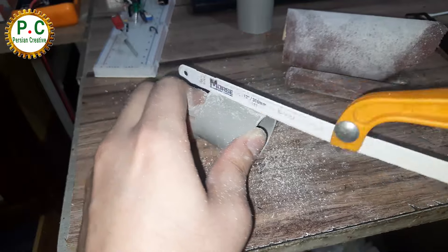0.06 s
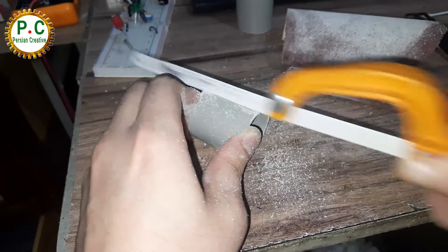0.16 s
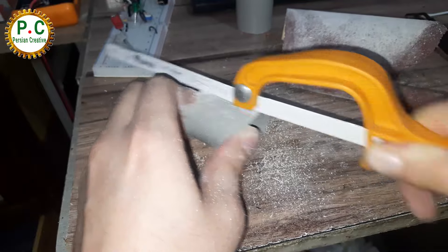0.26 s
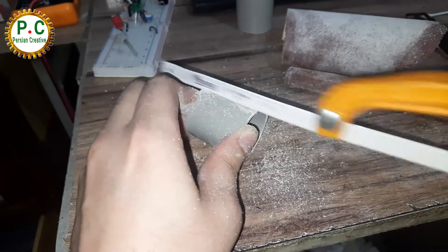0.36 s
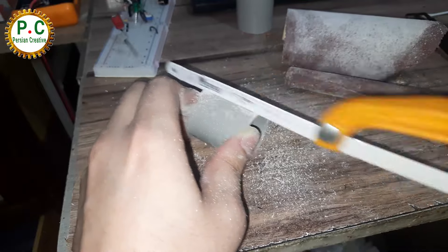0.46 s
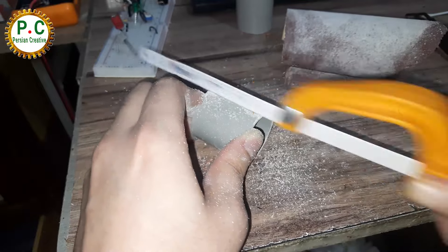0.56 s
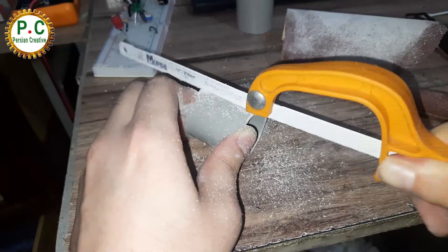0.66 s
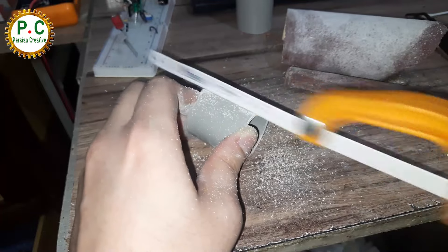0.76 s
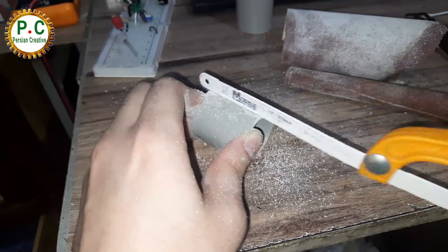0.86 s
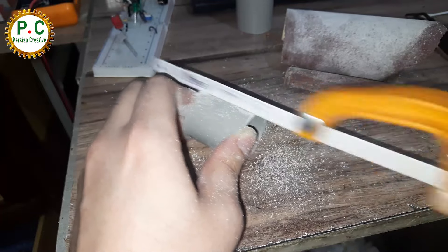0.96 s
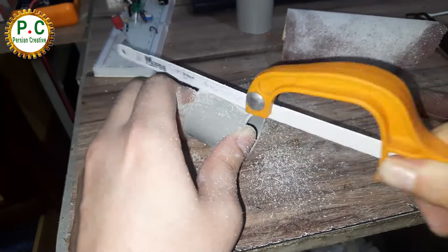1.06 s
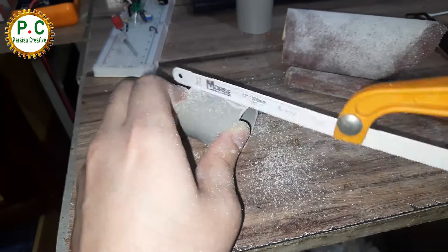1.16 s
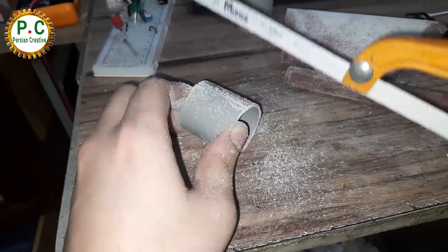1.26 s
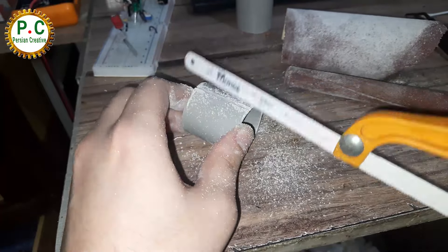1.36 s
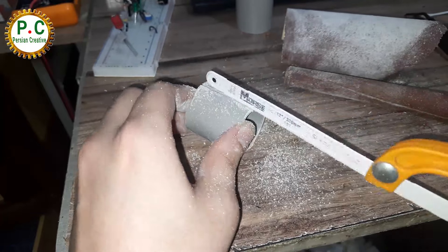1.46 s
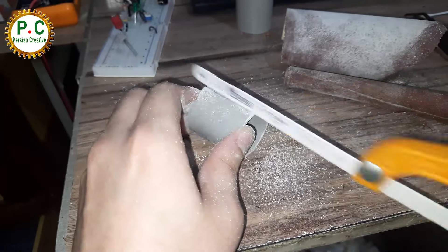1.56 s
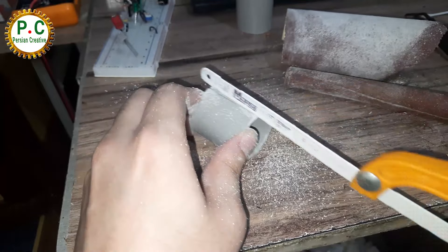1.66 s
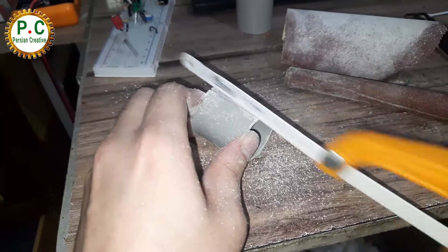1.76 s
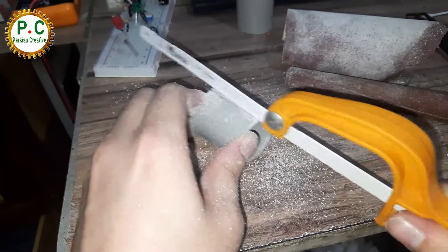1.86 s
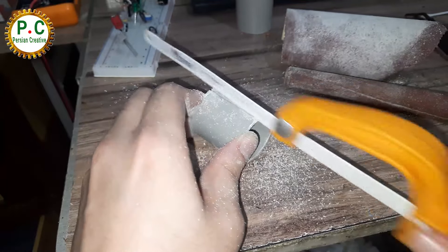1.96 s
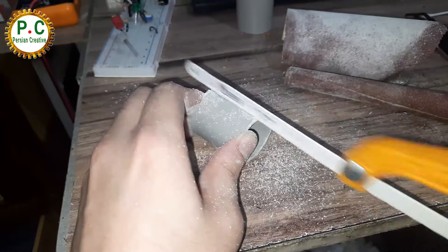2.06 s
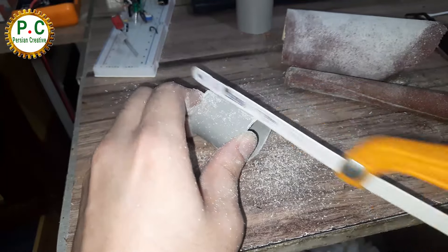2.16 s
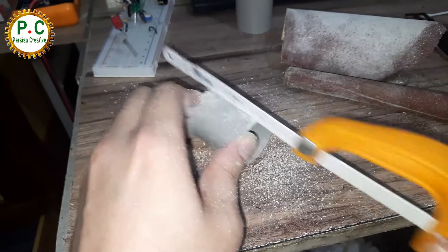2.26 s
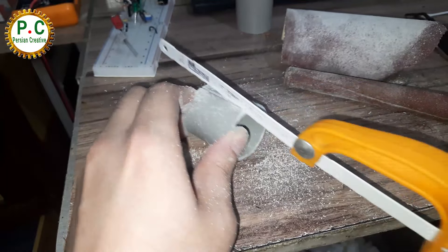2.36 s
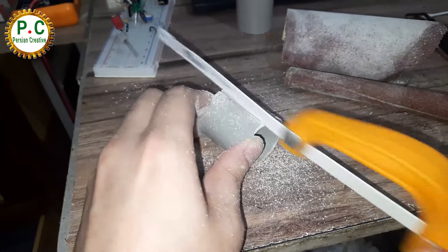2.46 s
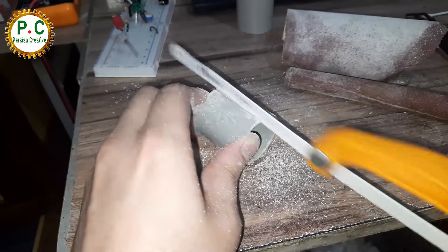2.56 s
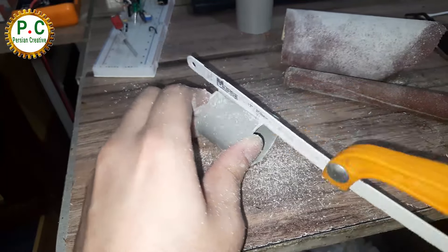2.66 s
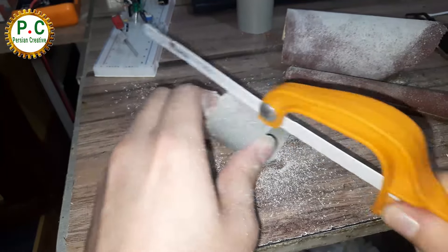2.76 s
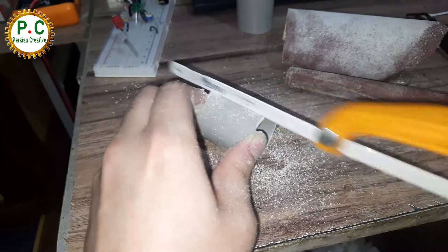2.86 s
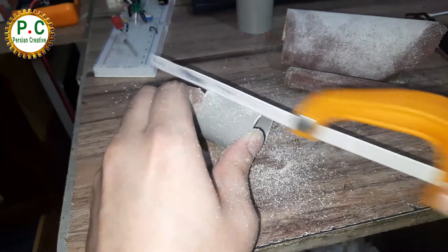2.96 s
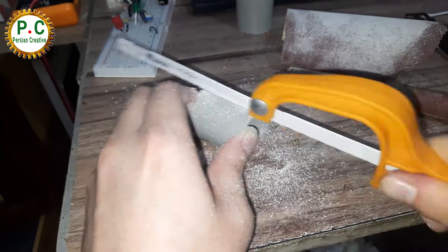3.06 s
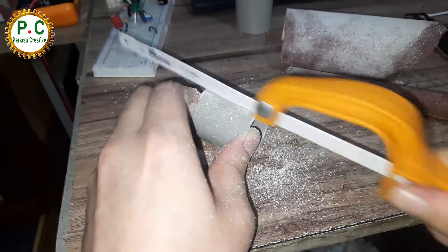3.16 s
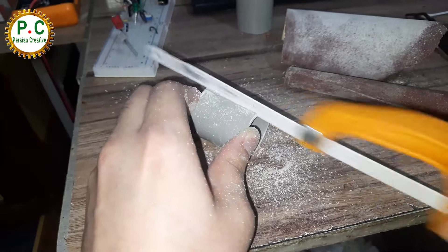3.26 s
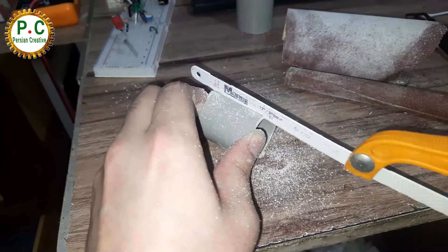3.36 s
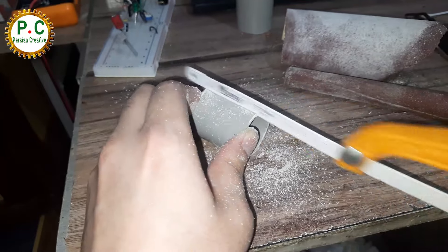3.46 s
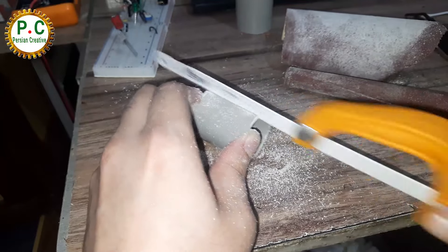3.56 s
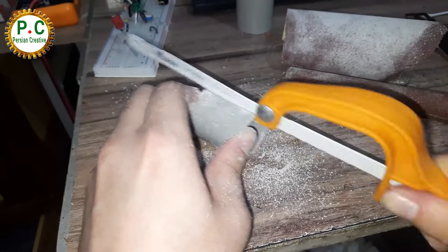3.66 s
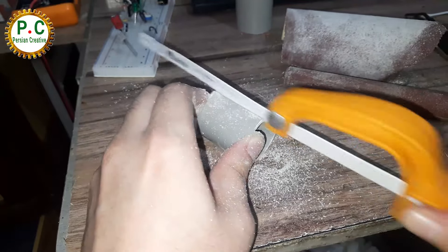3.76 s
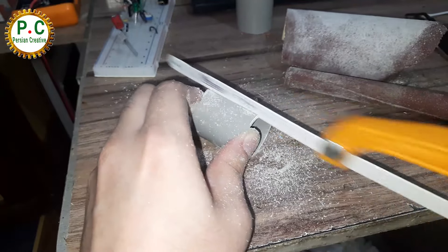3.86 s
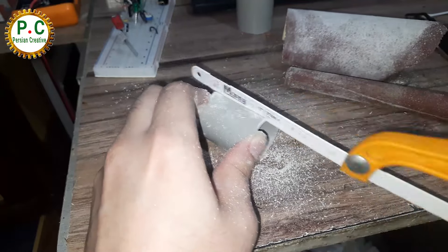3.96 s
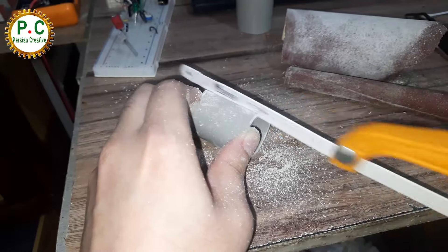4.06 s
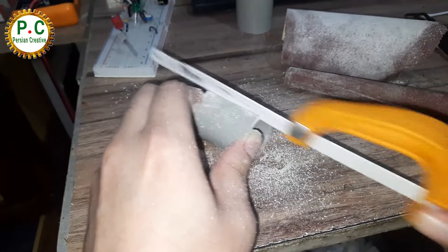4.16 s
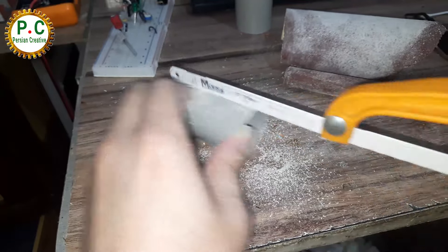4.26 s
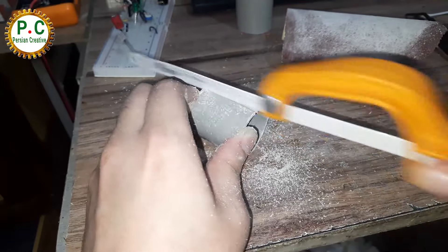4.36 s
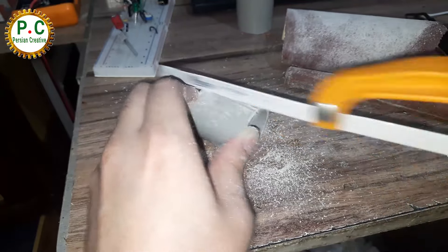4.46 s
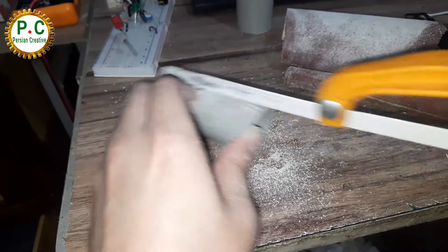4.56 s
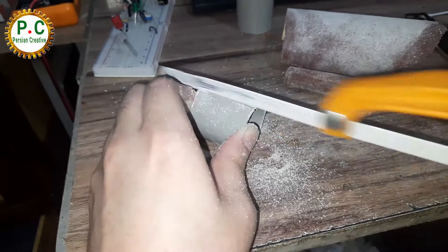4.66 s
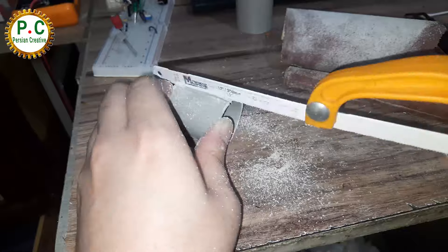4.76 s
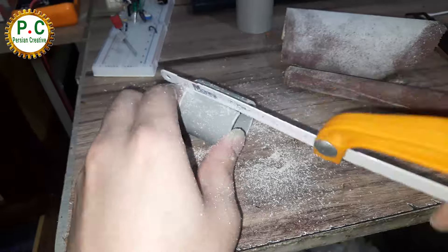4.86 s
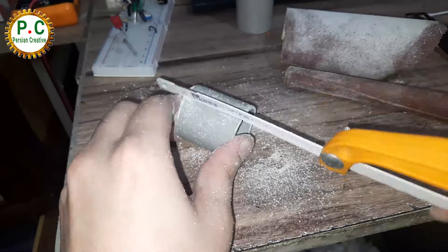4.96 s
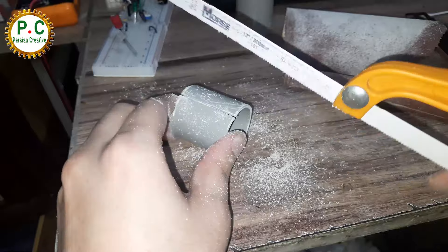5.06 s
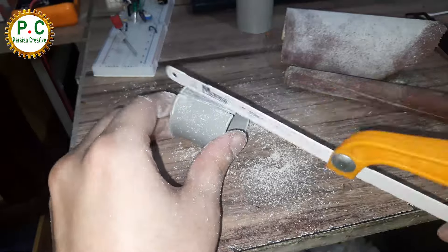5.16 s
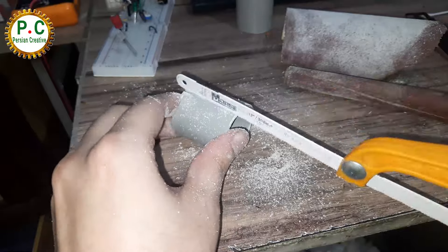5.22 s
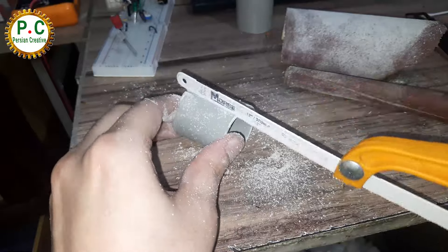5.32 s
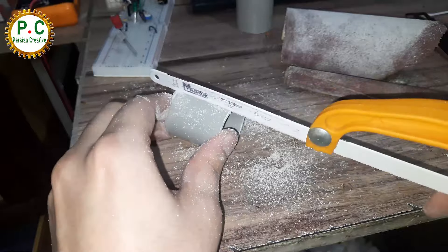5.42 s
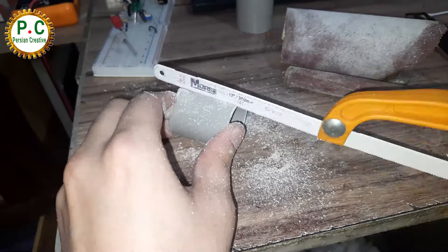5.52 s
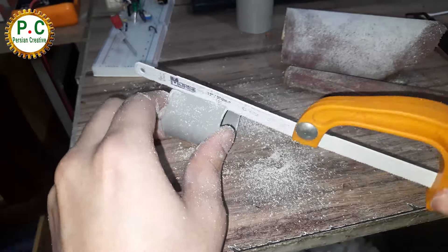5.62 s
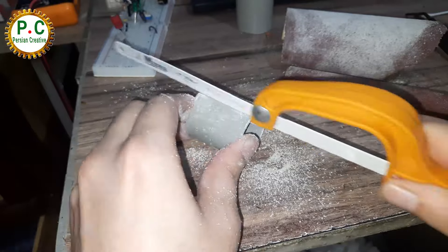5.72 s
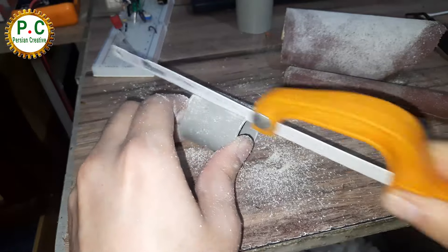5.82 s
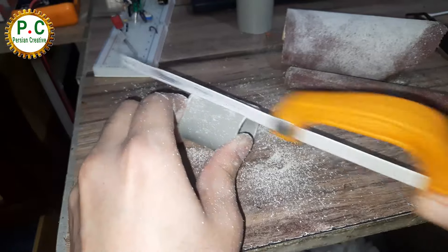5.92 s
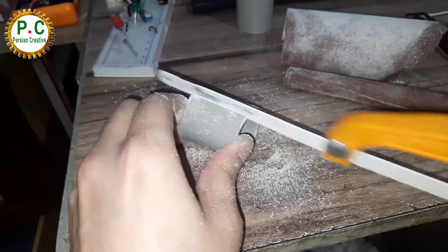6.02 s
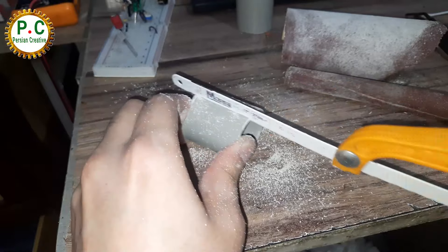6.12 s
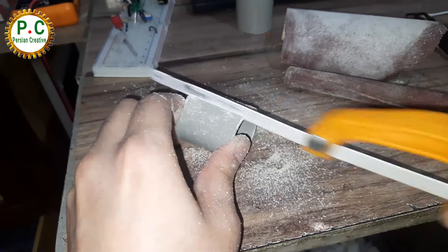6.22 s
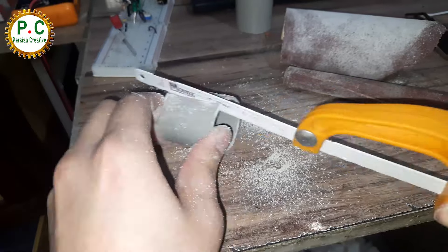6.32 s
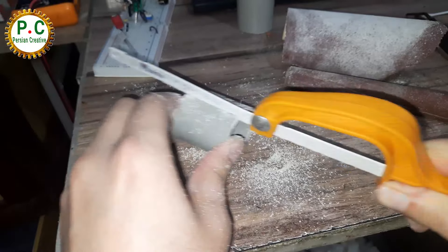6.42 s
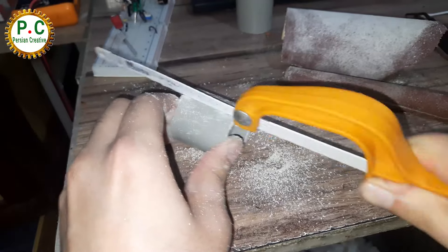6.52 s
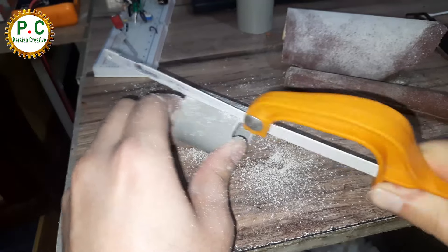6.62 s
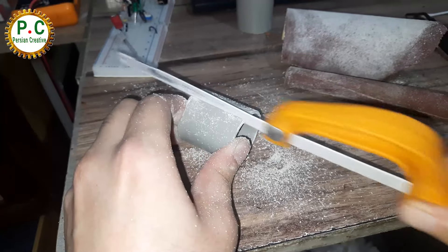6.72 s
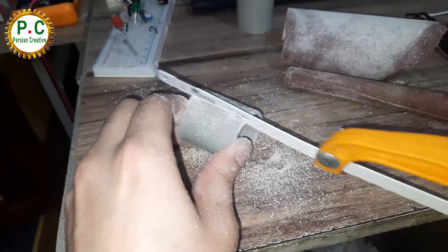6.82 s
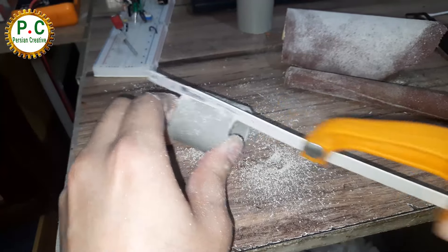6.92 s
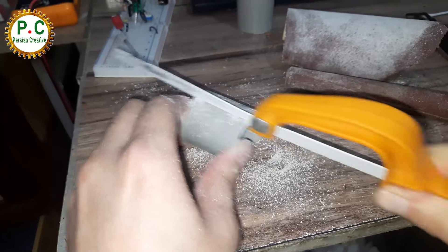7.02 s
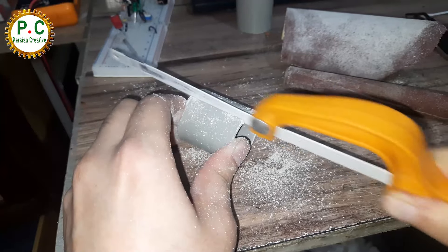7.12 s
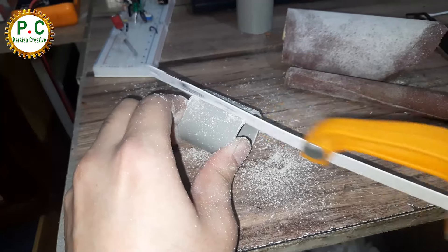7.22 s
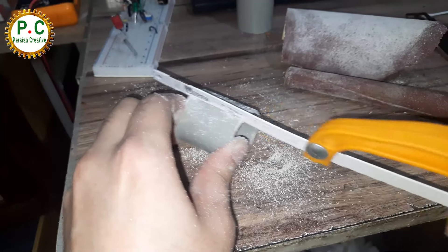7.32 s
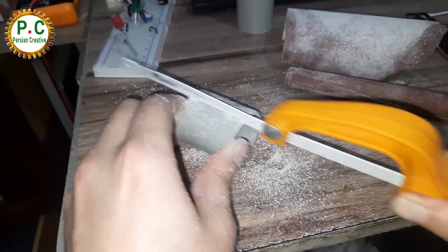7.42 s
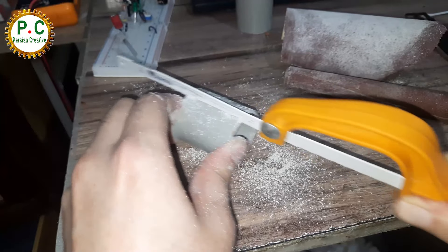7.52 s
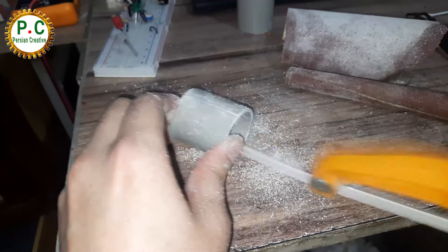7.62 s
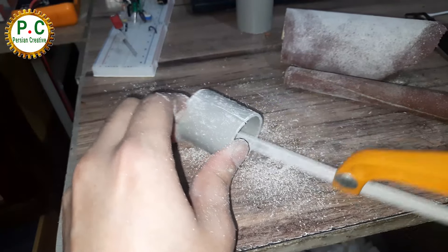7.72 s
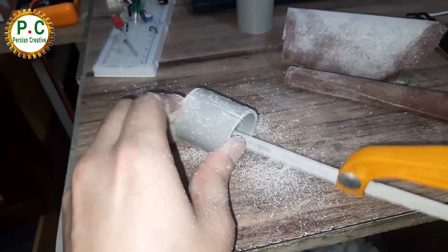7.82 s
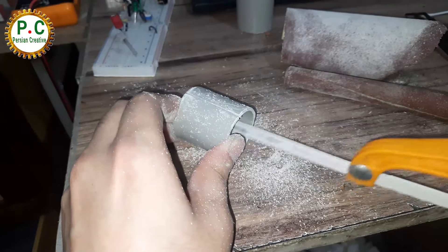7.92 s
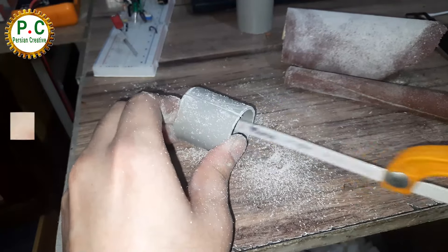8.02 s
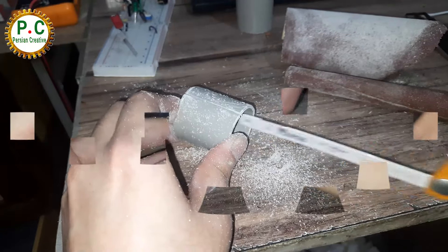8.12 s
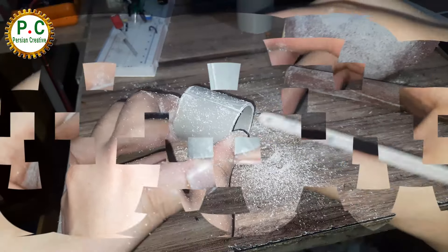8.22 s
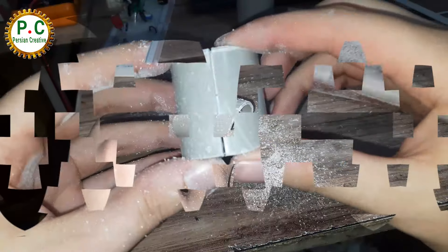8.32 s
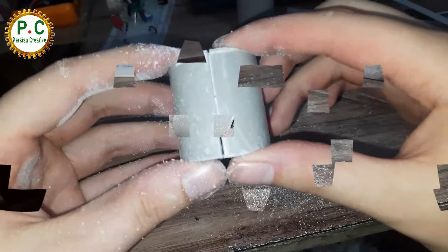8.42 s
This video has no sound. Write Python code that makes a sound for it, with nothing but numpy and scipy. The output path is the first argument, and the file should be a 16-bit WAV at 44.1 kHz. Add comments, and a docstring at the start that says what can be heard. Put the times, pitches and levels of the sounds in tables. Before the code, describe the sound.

Frantic, high-pitched sawing of plastic at about 25 strokes a second, two gaps, then slower, deeper rasps ending in a snap, scrape and two taps.

```python
"""Hacksaw through a plastic pipe

A small hacksaw slits a short plastic pipe held on a wooden bench, close to the microphone, in a small
room with mains hum. The first 6.6 s run at five times natural speed, so strokes, resonances, hum and
echo are five times higher and shorter. Then come four strokes at natural speed; the blade breaks through,
scrapes out of the slit and taps the pipe twice. Teeth are clicks and noise paced by the blade; blows
ring the pipe's modes. Layer gains and the room still act on the levels in the tables of contacts."""
import sys
import numpy as np
from scipy import signal
from scipy.fft import rfft, irfft, next_fast_len
from scipy.io import wavfile

SR = 44100
rng = np.random.default_rng(int(sys.argv[2]) if len(sys.argv) > 2 else 0)


def pcm_store(signal):
    """Save signal as 16-bit PCM."""
    levels = np.round(np.clip(np.atleast_2d(signal), -1, 1) * 32767)
    wavfile.write(sys.argv[1], SR, levels.astype(np.int16).T)


N = 374048
T = np.arange(N) / SR
FAST, SLOW_FROM_S = 5, 6.635  # speed of the quick part; where the natural speed begins


def undb(db):
    """Decibels to gain."""
    return 10 ** (np.asarray(db) / 20)


def unit(x):
    """Scale to rms 1."""
    return x / np.sqrt(np.mean(x ** 2))


def noise():
    """White noise."""
    return rng.standard_normal(N)


def walk(rate_hz):
    """Random values joined by lines, rate_hz of them a second."""
    steps = rng.standard_normal(N // 4)
    return np.interp(T * rate_hz, np.arange(len(steps)), steps)


def response(points, size):
    """Gains of a spectrum of (hz, level_db) points that falls 20 dB an octave more past its ends."""
    octave = np.log2(np.maximum(np.fft.rfftfreq(size, 1 / SR), 1))
    hz, db = np.transpose(points)
    at = np.log2(np.maximum(hz, 1))
    outside = np.maximum(at[0] - octave, 0) + np.maximum(octave - at[-1], 0)
    return undb(np.interp(octave, at, db) - 20 * outside)


def colour(x, points):
    """Filter by a spectrum of (hz, level_db) points; rms 1."""
    size = next_fast_len(N)
    return unit(irfft(rfft(x, size) * response(points, size), size)[:N])


def filtered(kind, order, edge_hz, x, both_ways=False):
    """Butterworth filter, run forwards or both ways."""
    sos = signal.butter(order, edge_hz, kind, fs=SR, output="sos")
    return signal.sosfiltfilt(sos, x) if both_ways else signal.sosfilt(sos, x)


def chips(rate_hz, spread_db):
    """Sparse clicks of very uneven size: plastic chips breaking off."""
    breaks = rng.random(N) < rate_hz / SR
    size_db = spread_db * np.minimum(rng.exponential(size=N), 5)
    return unit(breaks * noise() * undb(size_db))


def struck(rows, column, rise_s=0.00034):
    """Envelope of blows: a sudden rise, then an exponential fall with each row's own decay (last column)."""
    out = np.zeros(N)
    for row in rows:
        start = int(row[0] * SR)
        age = T[:min(SR // 8, N - start)]
        fall = np.exp(-age / max(row[-1], 1e-4))
        out[start:start + len(age)] += undb(row[column]) * np.minimum(age / rise_s, 1) * fall
    return out


def snap(rows, column, points, size=2048):
    """The first instant of each contact: one coloured minimum-phase click with a sheer front."""
    rows, pulses = np.array(rows), np.zeros(N)
    pulses[(rows[:, 0] * SR).astype(int)] = undb(rows[:, column])
    # folding the cepstrum packs the energy at the front
    cepstrum = irfft(np.log(response(points, size)))
    folded = np.r_[cepstrum[0], 2 * cepstrum[1:size // 2]]
    click = irfft(np.exp(rfft(folded, size)))
    return signal.oaconvolve(pulses, click / np.abs(click).max())[:N]


def swell(crest_s, db, rise_db_s, fall_db_s, hold_s=0):
    """Envelope that rises to its crest, holds and falls, evenly in dB."""
    before = np.maximum(crest_s - T, 0)
    after = np.maximum(T - crest_s - hold_s, 0)
    return undb(db - rise_db_s * before - fall_db_s * after)


# level of the steady background noise over time: time_s [s], level_db [dB]
BACKGROUND_LEVEL = [(0, -60), (1.4, -75), (4.9, -74.5), (5.4, -78.5), (6.4, -69.5), (8.2, -83.5),
                    (8.48, -77)]
# spectra of the background noise at the microphone, quick then natural speed: pitch_hz [Hz], level_db [dB]
QUICK_AIR = [(60, -31), (110, -42), (195, -29.5), (250, -3), (300, -1), (420, -13), (480, -16.5),
             (600, -2.5), (720, -19.5), (900, -11.5), (1200, -14), (2200, -22.5), (2490, -10.5),
             (2750, -22.5), (8000, -33), (15000, -40)]
SLOW_AIR = [(15, -38.5), (25, -20.5), (43, -9.5), (87, -8), (124, -17), (159, -14.5), (389, -23),
            (496, -22), (669, -32.5), (7300, -42), (16500, -44)]
# mains hum and the tones that waver beside it: pitch_hz [Hz], level_db [dB], waver_db [dB]
QUICK_HUM = [(282, -80, 1.5), (398, -86.5, 10), (600, -76, -0.5), (880, -92, 6.5)]
SLOW_HUM = [(59, -84.5, 1.7), (118, -81, 1), (500, -90.5, 2)]


def background(air, hum, speed):
    """Softly wavering noise, partly shared by the two sides, and hum tones that drift in level and phase."""
    shared = colour(noise(), air)
    air_db = np.interp(T, *np.transpose(BACKGROUND_LEVEL)) + 1.5 * walk(3 * speed)
    out = np.array([unit(shared + 0.5 * colour(noise(), air)) for _ in range(2)]) * undb(air_db)
    for hz, db, waver in hum:
        level = np.sqrt(2) * undb(db + waver * walk(5 * speed))
        out = out + level * np.sin(2 * np.pi * hz * T + 0.43 * waver * walk(4 * speed))
    return out


# the bench and the corner it stands in ring, at natural speed: pitch_hz [Hz], width_hz [Hz], level_db [dB]
BENCH_MODES = [(115.7, 7.1, -1.5), (175.7, 6, 1.5), (198, 5.9, 3), (297.8, 2.9, 6.5), (328.7, 5.4, -6.5),
               (382.7, 8, -18.5), (431.3, 10, -14), (585, 7, -7.5)]


def room(x, speed, lag_ms, early_db, early_s, late_db, t60_s, damp_hz, boom_db, boom_s, boom_hz,
         wide_hz, modes_db):
    """Direct sound, the left side first; the ringing bench, near reflections, a duller tail and a low boom.

    The times early_s, t60_s and boom_s are 60 dB decays at natural speed."""
    size = next_fast_len(N + SR)
    hz, age = np.fft.rfftfreq(size, 1 / SR), T[:SR] * speed

    def echoes(t60):
        """Decaying noise that is wider in stereo at higher pitch."""
        decay = np.exp(-np.log(1000) * age / t60) * np.minimum(age / 0.0032, 1)
        burst = rng.standard_normal((2, SR)) * decay
        mid, side = rfft(burst / np.sqrt(np.sum(burst ** 2, axis=1, keepdims=True)), size)
        width = hz / (hz + wide_hz)
        return (mid + width * side * np.array([[1], [-1]])) / np.sqrt(1 + width ** 2)

    direct = np.exp(-2j * np.pi * hz * np.array([[0], [lag_ms / 1000]]))
    ring = sum(undb(db) / (1 + 2j * (hz / speed - centre) / width) for centre, width, db in BENCH_MODES)
    early = undb(early_db) * echoes(early_s)
    late = undb(late_db) * echoes(t60_s) / (1 + 1j * hz / damp_hz)
    boom = undb(boom_db) * echoes(boom_s) / (1 + 1j * hz / boom_hz) ** 3
    paths = direct + undb(modes_db) * ring + early + late + boom
    heard = irfft(rfft(x, size) * paths, size)[:, :N]
    return heard / np.sqrt(1 + undb(early_db) ** 2 + undb(late_db) ** 2)


# the blade lifts off and the pipe slides under the fingers:
# crest_s [s], level_db [dB], rise_db_s [dB/s], fall_db_s [dB/s]
RUBS = [(1.257, -59, 1998, 702), (1.352, -72, 900, 400)]
# spectrum of fingers on plastic: pitch_hz [Hz], level_db [dB]
RUB_COLOUR = [(2300, -16), (3100, 5), (4200, -4), (5200, -21)]


def rub():
    """Faint, soft rubs on the pipe as the grip shifts: swells of coloured noise."""
    return colour(noise(), RUB_COLOUR) * sum(swell(*row) for row in RUBS)


# the hand shifts the pipe on the bench: start_s [s], thud_db [dB], wood_db [dB], decay_s [s]
BUMPS = [(1.329, -39.5, -65, 0.0032), (1.339, -41, -68, 0.0027), (1.4905, -26, -39, 0.0049),
         (1.4995, -56, -26.5, 0.0023), (1.508, -33.5, -47, 0.0068), (5.228, -78, -63.5, 0.012),
         (5.289, -72, -62, 0.0056), (5.392, -61, -80.5, 0.009), (5.666, -57, -55, 0.0066)]
# spectra of those bumps, thud then wood: pitch_hz [Hz], level_db [dB]
BUMP_COLOURS = [
    [(200, 0.5), (320, 6), (500, 1), (720, -40)],
    [(550, 5), (1200, 6), (1700, -14), (2400, -23)],
]


def bumps():
    """Soft, dull contacts of the pipe with the bench: short noise bursts with no deep bass."""
    thud, wood = (colour(noise(), points) for points in BUMP_COLOURS)
    contact = thud * struck(BUMPS, 1, rise_s=0.0014) + wood * struck(BUMPS, 2, rise_s=0.0021)
    return filtered("high", 4, 270, contact)


# the last web tears, then the blade scrapes out of the slit:
# crest_s [s], level_db [dB], rise_db_s [dB/s], fall_db_s [dB/s]
SCRAPES = [(7.661, -25.5, 643.5, 2998), (7.706, -26.5, 445.5, 202.5)]
# spectra of the scrape and of the shuddering bench: pitch_hz [Hz], level_db [dB]
SCRAPE_COLOUR = [(290, -26.5), (500, -15.5), (605, -2.5), (651, -8.5), (1100, -10), (1220, 1), (1430, -14),
                 (1570, 1.5), (2130, -3.5), (2500, -3), (2650, -6.5), (3210, -6), (7380, -15),
                 (10000, -22.5), (15300, -21.5), (16500, -52)]
RUMBLE_COLOUR = [(15, -49.5), (25, -20), (118, -1.5), (151, -1.5), (181, -1.5), (334, -5), (387, -6.5),
                 (498, -8), (600, -4), (780, -36), (1320, -120)]


def breakthrough():
    """The last web of plastic tears and the blade scrapes out, widely scattered, while the bench shudders."""
    shared = noise() + 0.66 * chips(1300, spread_db=-6.5)
    scrape = np.array([colour(shared + 2.5 * noise(), SCRAPE_COLOUR) for _ in range(2)])
    scrape = scrape * sum(swell(*row) for row in SCRAPES)
    # deep rumble, separate noise left and right
    deep = [(20, -13), (55, -2.0), (110, -7.0), (200, -33.5)]
    deep_rumble = np.array([undb(db) * colour(noise(), deep) for db in (-7, -14)])
    level = swell(7.605, -46.5, rise_db_s=1402.5, fall_db_s=170, hold_s=0.24)
    return scrape + (colour(noise(), RUMBLE_COLOUR) + deep_rumble) * level


# modes of the pipe held in the hand: pitch_hz [Hz], width_hz [Hz], level_db [dB]
PIPE_MODES = [(620, 80, 4), (1050, 180, -5), (1250, 180, 11), (1480, 120, 8), (1630, 99, 4),
              (1805, 130, -3), (2070, 160, -12.5), (3300, 550, -9), (5380, 600, -22)]


def pipe(x):
    """The hand-damped modes of the pipe: parallel resonators."""
    return sum(undb(db) * signal.lfilter(*signal.iirpeak(hz, hz / width, fs=SR), x)
               for hz, width, db in PIPE_MODES)


# the blade strikes the pipe at natural speed:
# start_s [s], thud_db [dB], ring_db [dB], crack_db [dB], decay_s [s]
BLOWS = [(6.648, -33, -48, -39, 0.011), (6.98, -27, -42, -35, 0.0064), (7.659, -30, -21, -35, 0.003),
         (7.6745, -35.5, -25.5, -6.5, 0.0012), (7.8925, -26.5, -24, -21, 0.00081),
         (8.033, -63.5, -55, -31, 0.0047)]
# spectrum of the crack of steel on plastic: pitch_hz [Hz], level_db [dB]
CRACK_COLOUR = [(290, -61), (700, -20.5), (1790, 10.5), (2460, -3), (3300, 11), (3930, 8), (6010, -1.5),
                (8060, -5), (10500, -19), (13800, -3.5), (16500, -28)]


def blows(kick_db=10, snap_db=4, splinter_db=-11, linger_db=-22, linger_s=0.036):
    """Steel on plastic: a crack, a short ring of the pipe that lingers faintly, and a low thud of its wall."""
    contact, force = noise(), struck(BLOWS, 2)
    kick = undb(kick_db) * snap(BLOWS, 2, [(300, 0), (16000, 0.0018)])
    ring = pipe(kick + 2.86 * contact * force) / np.std(pipe(contact))
    # energy of the blows, stored and slowly released
    stored = signal.lfilter([1], [1, -np.exp(-1 / (linger_s * SR))], force ** 2) / (0.0037 * SR)
    tones = colour(noise(), [(1380, -9.5), (1480, 1.5), (1560, -4), (1640, -1.0), (1800, -19.5)])
    linger = undb(linger_db) * np.sqrt(stored) * tones
    splinter = undb(splinter_db) * colour(noise(), CRACK_COLOUR) * struck(BLOWS, 3)
    crack = splinter + undb(snap_db) * snap(BLOWS, 3, CRACK_COLOUR)
    # the thud has the spectrum of the chattering pipe wall
    thud = colour(noise(), SLOW_COLOURS[1]) * struck(BLOWS, 1, rise_s=0.0013)
    return thud + ring + linger + crack


# the blade catches in the slit during the quick part: start_s [s], knock_db [dB], tick_db [dB]
CATCHES = [(0.4145, -54, -32.5), (1.2515, -54, -48.5), (1.5215, -78, -44), (1.5556, -38, -27),
           (1.5601, -31.5, -20), (1.7416, -31, -15.5), (1.9871, -36.5, -31), (2.0328, -36, -27),
           (2.2716, -38, -24), (2.3222, -37.5, -28.5), (2.4138, -30.5, -35), (2.5744, -28, -16.5),
           (2.6139, -36, -17.5), (2.7049, -26, -10), (2.7425, -42.5, -15), (3.0099, -35.5, -34),
           (3.1862, -42, -27.5), (3.229, -56, -34), (3.2725, -45, -27.5), (3.316, -35, -23),
           (3.4426, -31.5, -25.5), (3.7033, -44.5, -29), (4.2381, -47.5, -20), (4.3262, -30.5, -22.5),
           (4.5075, -34, -33), (4.5624, -44.5, -16.5), (4.8615, -52.5, -52), (5.0724, -30, -27.5),
           (6.4677, -41.5, -28), (6.5814, -50, -21.5)]
# what a catch shakes, bench then wall and blade: pitch_hz [Hz], level_db [dB]
CATCH_COLOURS = [
    [(150, -19.5), (330, -12), (500, 1.5), (620, 4), (740, -12.5), (900, 3.5)],
    [(750, -9), (950, 1), (1250, -5.5), (1620, 7), (2500, 0.5), (2950, 1), (3400, -14.5), (5000, -30)],
]
# the first instant of a catch: pitch_hz [Hz], level_db [dB]
CATCH_CLICK = [(150, -50), (400, -10.5), (900, 2), (1600, -1), (2800, 3.5), (3600, -5), (5800, 3.5),
               (8000, -3.5), (14000, -3.5), (16000, -13)]


def catches(knocks, thud_db, body_db, tick_db, click_db):
    """A sharp click, then a short knock in bench, wall and blade and a tick with the rasp's spectrum."""
    thud, body, tick = (colour(noise(), points) for points in (*CATCH_COLOURS, QUICK_COLOURS[2]))
    rows = [(*row, 0.0025) for row in knocks]  # decay_s
    knock = undb(thud_db) * thud * struck(rows, 1, rise_s=0.00099)
    knock = knock + undb(body_db) * body * struck(rows, 1)
    contact = knock + undb(tick_db) * tick * struck(rows, 2)
    contact = contact + undb(click_db) * snap(rows, 2, CATCH_CLICK)
    return filtered("high", 3, 240, contact)


# slow gain curve for the quick strokes above 10.5 kHz: time_s [s], gain_db [dB]
TREBLE_GAIN = [(0, 1), (1.2, 2.5), (1.8, -9), (2.7, -2), (3.3, -5.5), (4.2, 3.5), (5.8, 4.5), (6.3, 7.5)]


def treble_gain(x, edge_hz=10500):
    """A slow gain curve for the strokes above the edge."""
    top = filtered("high", 3, edge_hz, x, both_ways=True)
    return x + (undb(np.interp(T, *np.transpose(TREBLE_GAIN))) - 1) * top


# the rasp flares up in separate bands around these: pitch_hz [Hz]
PATCH_HZ = [1200, 2600, 3800, 5000, 6300, 7800, 9500, 12000]


def patchy(x, rate_hz, depth_db):
    """As the free length of the blade changes, its bands flare up and fade, each at random."""
    size = next_fast_len(N)
    spectrum, hz = rfft(x, size), np.fft.rfftfreq(size, 1 / SR)
    out = 0
    for pick in np.eye(len(PATCH_HZ)):
        band = irfft(spectrum * np.interp(hz, PATCH_HZ, pick), size)[:, :N]
        out = out + band * undb(depth_db * walk(rate_hz))
    return unit(out)


# quick strokes, push and pull in turn: start_s [s], length_s [s], crest [place in the stroke, 0-1],
# top_tooth_hz [Hz], bench_db [dB], chatter_db [dB], rasp_db [dB], brightness_db [dB]
QUICK_STROKES = [(0.006, 0.063, 0.22, 1830, -59, -54, -44.5, 2),
                 (0.047, 0.046, 0.67, 1960, -51.5, -52, -40.5, 1),
                 (0.093, 0.04, 0.46, 1910, -75, -48, -44.5, 7),
                 (0.137, 0.031, 0.5, 1810, -65, -53.5, -46, 10),
                 (0.177, 0.034, 0.35, 1810, -63.5, -54, -40.5, 5.5),
                 (0.213, 0.04, 0.3, 1690, -69, -55, -46, 8.5),
                 (0.252, 0.035, 0.41, 2040, -64.5, -49, -43.5, 6.5),
                 (0.288, 0.034, 0.48, 1920, -58, -52, -42, 7),
                 (0.329, 0.036, 0.45, 2070, -63, -46.5, -43, 8.5),
                 (0.363, 0.042, 0.37, 1710, -67, -54.5, -46.5, 5),
                 (0.411, 0.033, 0.08, 1860, -50, -37, -31.5, 5.5),
                 (0.446, 0.036, 0.46, 1860, -59, -54, -44, 11),
                 (0.481, 0.047, 0.38, 1770, -51.0, -51.5, -45.5, 9.5),
                 (0.526, 0.042, 0.37, 1760, -54, -53, -41, 7),
                 (0.568, 0.039, 0.3, 1930, -59, -48.5, -45, 11),
                 (0.612, 0.037, 0.44, 2080, -58, -43.5, -37.5, -0.5),
                 (0.649, 0.041, 0.49, 2130, -57.5, -40.5, -37.5, 5.5),
                 (0.691, 0.043, 0.43, 2140, -60.5, -47.5, -40, 5),
                 (0.733, 0.037, 0.44, 2080, -72, -53, -44, 11.5),
                 (0.775, 0.047, 0.37, 2310, -58.5, -49.5, -42, 4.5),
                 (0.823, 0.031, 0.24, 1840, -57, -49, -42, 12),
                 (0.858, 0.03, 0.4, 1720, -56, -47.5, -39.5, 8),
                 (0.893, 0.042, 0.36, 1990, -54, -49, -42.5, 7.5),
                 (0.936, 0.034, 0.43, 1740, -59.5, -52, -43, 6),
                 (0.973, 0.035, 0.32, 1770, -54.5, -44, -43, 12),
                 (1.016, 0.038, 0.3, 1790, -56, -49.5, -40.5, 7),
                 (1.053, 0.036, 0.32, 2100, -67, -45.5, -45.5, 12),
                 (1.09, 0.042, 0.49, 2020, -63, -54, -43.5, 8),
                 (1.128, 0.054, 0.33, 2000, -58, -52.5, -47, 10),
                 (1.554, 0.048, 0.08, 1770, -52, -51, -36, -6.5),
                 (1.609, 0.029, 0.55, 1470, -58, -49.5, -46, 3),
                 (1.633, 0.059, 0.57, 1890, -58.5, -49, -39, -3.5),
                 (1.694, 0.035, 0.31, 1760, -53, -38, -33, -3),
                 (1.743, 0.048, 0, 1660, -44.5, -45.5, -30.5, 1),
                 (1.778, 0.036, 0.34, 1420, -53, -38, -42, 3),
                 (1.822, 0.038, 0.16, 1640, -49.5, -41, -36.5, -3),
                 (1.854, 0.042, 0.47, 1600, -54.5, -39.5, -41.5, 3),
                 (1.904, 0.034, 0.2, 1640, -51.5, -40, -35, -2),
                 (1.937, 0.032, 0.57, 1670, -49.5, -31.5, -32.5, -4),
                 (1.9865, 0.033, 0.16, 1410, -54.5, -35.5, -36, 1),
                 (2.023, 0.033, 0.49, 1690, -56, -33.5, -32.5, 1.5),
                 (2.066, 0.038, 0.27, 1680, -55, -41, -37.5, -1),
                 (2.101, 0.037, 0.48, 1640, -61, -39, -37.5, 3.5),
                 (2.149, 0.031, 0.28, 1660, -59, -43.5, -36.5, 1),
                 (2.186, 0.037, 0.43, 1830, -61, -43, -42, 8.5),
                 (2.225, 0.034, 0.46, 1900, -59.5, -48.5, -39.5, 4.5),
                 (2.27, 0.032, 0.3, 1740, -54.5, -43.5, -38.5, 2.5),
                 (2.32, 0.044, 0.19, 1810, -57.5, -43, -37.5, 0),
                 (2.355, 0.043, 0.27, 2020, -55.5, -47, -42.5, -7),
                 (2.404, 0.024, 0.32, 1740, -45, -44, -46, -6),
                 (2.437, 0.042, 0.34, 1730, -58, -52, -48.5, 1),
                 (2.471, 0.051, 0.5, 1700, -59.5, -49, -40, 3),
                 (2.525, 0.036, 0.32, 1540, -52, -42.5, -45, 3),
                 (2.569, 0.029, 0.19, 1820, -43.5, -41, -32.5, -11),
                 (2.614, 0.034, 0.36, 1530, -48, -43, -37, 1),
                 (2.653, 0.037, 0.3, 1580, -47, -42, -39.5, 2),
                 (2.7013, 0.037, 0.27, 1450, -51, -33.5, -35, 2),
                 (2.742, 0.037, 0, 1720, -42.5, -34, -28, -5),
                 (2.776, 0.053, 0.3, 1720, -52, -46, -46.5, -2.0),
                 (2.845, 0.075, 0.29, 1760, -60.5, -51.5, -47.5, 8),
                 (2.921, 0.037, 0.36, 1630, -67, -48.5, -43, 9),
                 (2.953, 0.047, 0.44, 1690, -54, -34, -38, 6),
                 (3.0107, 0.04, 0.4, 1710, -57.5, -49, -43.5, 9.5),
                 (3.053, 0.039, 0.32, 1850, -58, -40.5, -42, 10),
                 (3.093, 0.044, 0.48, 2170, -60.5, -48, -42.5, 8),
                 (3.141, 0.036, 0.27, 1860, -55.5, -42.5, -40.5, 6.5),
                 (3.188, 0.038, 0.22, 1660, -56.0, -43.5, -39.5, 6),
                 (3.225, 0.036, 0.29, 1790, -53, -37.5, -38.5, 6.5),
                 (3.275, 0.037, 0.29, 1580, -50.5, -50, -41, 2),
                 (3.314, 0.035, 0.23, 1470, -49, -38, -41.5, 11),
                 (3.359, 0.031, 0.17, 1640, -52, -45, -41.0, 4.5),
                 (3.394, 0.034, 0.33, 1670, -59, -46.0, -42.5, 5.5),
                 (3.4418, 0.031, 0.28, 1630, -60, -43, -39.5, 9.5),
                 (3.468, 0.052, 0.43, 1710, -57.5, -40.5, -38.5, 7.5),
                 (3.524, 0.038, 0.27, 1580, -53.5, -49, -44.5, 10),
                 (3.564, 0.048, 0.34, 1750, -58.5, -50, -42.5, 8),
                 (3.615, 0.022, 0.37, 2070, -53, -51, -44, 9),
                 (3.637, 0.061, 0.37, 1700, -58, -47, -40.5, 4),
                 (3.705, 0.032, 0.14, 1710, -48, -42.5, -40.5, 8.5),
                 (3.741, 0.035, 0.47, 1750, -56, -43, -42.5, 6),
                 (3.786, 0.038, 0.13, 1720, -50, -39, -40.5, 7.5),
                 (3.826, 0.035, 0.46, 1720, -55, -43.5, -43, 7),
                 (3.871, 0.033, 0.2, 1500, -57, -42, -42.5, 8),
                 (3.905, 0.039, 0.53, 1770, -57.5, -49, -42.5, 8),
                 (3.951, 0.039, 0.25, 1670, -53.5, -45.5, -43, 5.5),
                 (3.986, 0.038, 0.5, 1720, -57, -42.5, -43.5, 5),
                 (4.041, 0.037, 0.31, 1700, -52.5, -45.5, -46, 8),
                 (4.081, 0.042, 0.22, 1650, -65, -46.5, -44.5, 8.5),
                 (4.129, 0.042, 0.18, 1500, -52.5, -43, -45.5, 7),
                 (4.167, 0.04, 0.28, 1970, -58.5, -51, -49, 6),
                 (4.213, 0.03, 0.38, 1840, -52.5, -47.5, -43, 8),
                 (4.244, 0.06, 0.4, 1710, -59.5, -44, -41, 6.5),
                 (4.324, 0.051, 0.23, 1950, -49.5, -51, -41, -20),
                 (4.367, 0.053, 0.34, 1680, -59, -55, -49.5, 6.5),
                 (4.41, 0.052, 0.5, 1870, -59, -46.5, -41, 0), (4.468, 0.046, 0.32, 1940, -57, -46, -40, 1),
                 (4.506, 0.05, 0.2, 1700, -53.5, -53, -40.5, 3),
                 (4.56, 0.05, 0.24, 2030, -54.5, -42, -36.5, 3),
                 (4.6, 0.063, 0.17, 1890, -55.5, -52, -38, -5),
                 (4.656, 0.045, 0.46, 1710, -56, -47, -39.5, 1),
                 (4.694, 0.066, 0.33, 1670, -56.5, -45.5, -41, 2),
                 (5.844, 0.037, 0.52, 1790, -49.5, -47.5, -40, 5.5),
                 (5.88, 0.05, 0.53, 1610, -61, -46, -38.5, -1),
                 (5.938, 0.053, 0.21, 1800, -50.5, -51, -39, 4.5),
                 (5.985, 0.037, 0.2, 1780, -59, -43, -36, 1),
                 (6.025, 0.041, 0.48, 2110, -55, -48.5, -41, 1.5),
                 (6.066, 0.047, 0.46, 1780, -71, -49.5, -46.5, 10),
                 (6.117, 0.038, 0.31, 2110, -60, -52, -47.5, 8.5),
                 (6.156, 0.036, 0.33, 1600, -63, -51, -41.5, 2.5),
                 (6.201, 0.035, 0.4, 1640, -55, -55, -46, 5.5), (6.241, 0.043, 0.4, 1570, -65, -49, -43, 0),
                 (6.29, 0.039, 0.24, 1570, -58, -48, -48, 7.5),
                 (6.325, 0.042, 0.45, 1540, -59, -44, -43, 4),
                 (6.466, 0.056, 0.3, 1680, -57.5, -50, -41, 0),
                 (6.51, 0.044, 0.36, 1700, -55.5, -45, -43.5, 5),
                 (6.559, 0.036, 0.28, 1880, -56.5, -52, -40.5, 7.5),
                 (6.589, 0.052, 0.37, 1563, -56, -40, -38, 1)]
# light, short drags while the blade is lifted or set back in the slit:
# start_s [s], length_s [s], chatter_db [dB], rasp_db [dB]
DRAGS = [(1.183, 0.036, -59, -44.5), (1.246, 0.02, -78, -64), (1.433, 0.015, -69, -49.5),
         (1.454, 0.012, -58.5, -52), (1.466, 0.014, -61, -55), (4.761, 0.03, -60, -49),
         (4.857, 0.03, -65.5, -62.5), (5.068, 0.03, -56.5, -52), (5.217, 0.036, -74, -59),
         (5.261, 0.035, -80, -62.5), (5.434, 0.031, -64, -55.5), (5.549, 0.022, -69.5, -63),
         (5.632, 0.018, -88, -68), (5.66, 0.025, -62, -64.5), (5.737, 0.023, -49.5, -38.5),
         (5.796, 0.033, -61, -40), (6.369, 0.029, -58.5, -59), (6.412, 0.03, -61, -61.5)]


def quick_strokes():
    """The quick strokes and light drags; a push that bites crests early and breaks free with a click."""
    bites = []
    for start, _, crest, _, _, chatter, rasp, _ in QUICK_STROKES:
        if crest < 0.65:
            # full bite at a crest of 0.27, none from 0.65
            bite_db = 20 * np.log10(np.interp(crest, (0.27, 0.65), (1, 0.1)))
            bites.append((start, chatter + 4 + bite_db, rasp - 4.5 + bite_db))
    # crest 0.33, top tooth rate 1758 Hz, bench 0.5 dB under the chatter, brightness -2.5 dB
    drags = [(start, length, 0.33, 1758, chatter - 0.5, chatter, rasp, -2.5)
             for start, length, chatter, rasp in DRAGS]
    return list(QUICK_STROKES) + drags, bites


def stroke_motion(strokes, speed, shape, glide, pure, lock):
    """Each stroke speeds up and stops: levels of bench, chatter and rasp, tooth rate, sung share, brightness."""
    levels, rate_hz = np.zeros((3, N)), np.full(N, 200. * speed)
    tonal, bright_db = np.zeros(N), np.zeros(N)
    leans = rng.uniform(0.85, 1.3, len(strokes))
    for (start, length, crest, hz, bench, chatter, rasp, brightness), lean in zip(strokes, leans):
        span = slice(max(int(start * SR), 0), int((start + length) * SR))
        travel = np.linspace(0, 1, span.stop - span.start)
        # bend the half sine so that it peaks at the crest
        bend = np.log(0.5) / np.log(np.clip(crest, 0.05, 0.9))
        blade = np.abs(np.sin(np.pi * travel ** bend))
        levels[:, span] += undb([bench, chatter, rasp])[:, None] * blade ** shape
        rate_hz[span] = hz * (1 - glide * (1 - np.sin(np.pi * travel ** lean)))
        # strokes that chatter hard or swell smoothly lock on to the tooth rate
        tonal[span] = np.clip(pure + 0.02 * (chatter - rasp) + lock * (crest - 0.4), 0.15, 0.92)
        bright_db[span] = brightness
    return levels, rate_hz, tonal, bright_db


def chatter_of_wall(phase, tonal, points, speed, octave_db):
    """The pipe wall sings at the tooth rate and its octave as teeth snag unevenly, with noise for the rest."""
    tones = np.sin(phase) + undb(octave_db) * np.sin(2 * phase)
    snags = unit(tones * undb(2.2 * walk(70 * speed)))
    return np.sqrt(tonal) * snags + np.sqrt(1 - tonal) * colour(noise(), points)


# chips snapping off the wall: pitch_hz [Hz], level_db [dB]
GRIT_COLOUR = [(700, -11), (1500, 9.5), (2800, -3.5), (6000, -6.5), (9000, -18.5)]


def rasp_of_teeth(phase, bright_db, points, speed, bite, chip_share, spread, patchy_db, bright_hz, sing,
                  grit_db):
    """Every tooth tears off a burst of dust; larger chips fall at random and a band sings above them."""
    dust = unit(np.exp(bite * np.cos(phase))) * noise() + chip_share * chips(500 * speed, spread_db=5.5)
    # the long blade radiates a little differently to each side
    rasp = np.array([colour(dust + spread * noise(), points) for _ in range(2)])
    rasp = patchy(rasp, 14 * speed, patchy_db)
    treble = filtered("band", 2, [bright_hz, 1.59 * bright_hz], rasp, both_ways=True)
    rasp = rasp + (undb(bright_db) - 1) * treble
    # a broad band near four times the tooth rate follows the blade's speed
    band = walk(450 * speed) * np.cos(4 * phase) + walk(450 * speed) * np.sin(4 * phase)
    grit = colour(chips(130 * speed, spread_db=3.0), GRIT_COLOUR)
    return rasp + sing * unit(band) + undb(grit_db) * grit


# strokes at natural speed: start_s [s], length_s [s], crest [place in the stroke, 0-1],
# top_tooth_hz [Hz], bench_db [dB], chatter_db [dB], rasp_db [dB], brightness_db [dB]
SLOW_STROKES = [(6.715, 0.2, 0.45, 261.4, -50.5, -40, -40.5, -2.5),
                (6.975, 0.15, 0.24, 416, -48.5, -43, -39.5, 3.5),
                (7.155, 0.185, 0.35, 238.9, -51.5, -40, -42.5, 2),
                (7.39, 0.14, 0.22, 305.2, -45, -42, -43, 5)]
# spectra of the bench, the chattering pipe wall and the rasp of the teeth, quick then natural speed:
# pitch_hz [Hz], level_db [dB]
QUICK_COLOURS = [
    [(18, -46), (30, -29), (120, -24), (215, -20), (285, -4.5), (352, -11.5), (400, -1.5), (524, -5.5),
     (596, 3.5), (697, -18.5), (759, -3), (900, -5), (1170, -4), (1980, -120)],
    [(470, -52), (800, -27.5), (920, -9.5), (1280, -2), (1610, -4.5), (1930, -9.5), (2100, 0.5),
     (2660, -13), (2880, -10.5), (3200, -34.5), (4160, -60), (7040, -120)],
    [(1650, -5), (2800, 1), (2950, 0), (3630, -5.5), (5420, -0.5), (6190, 4), (7030, -4), (8030, -2.5),
     (10600, -7.5), (13500, -3.5), (15700, -14.5), (16100, -22.5), (16500, -59.5)],
]
SLOW_COLOURS = [
    [(18, -62), (30, -30.5), (59, -2), (91, -20.5), (113, -4.5), (140, -10), (190, -6.5), (250, -36.5),
     (420, -120)],
    [(100, -36), (170, -1), (231, -4.5), (388, 0.5), (415, 0), (549, -11.5), (584, -16), (650, -17),
     (840, -52), (1430, -120)],
    [(350, -31), (600, -3.5), (729, -16.5), (781, -5), (849, -10.5), (1250, -1), (1400, -7), (2680, -9.5),
     (3440, -16.5), (5290, -17.5), (7280, -17.5), (9090, -22), (13800, -13.5), (15800, -21), (16500, -51.5)],
]


def sawing(strokes, colours, speed, shape, glide, wander, jitter, octave_db, patchy_db, flutter_db, pure,
           lock, bite, chip_share, sing, spread, bright_hz, bench_db, chatter_db, rasp_db, grit_db):
    """Teeth snag on the pipe's edge at a rate that follows the blade, shaking the bench and the wall.

    glide, wander and jitter are shares of the tooth rate: its sag at the stroke ends, slow and fast straying."""
    levels, rate_hz, tonal, bright_db = stroke_motion(strokes, speed, shape, glide, pure, lock)
    straying = 1 + wander * walk(25 * speed) + jitter * walk(200 * speed)
    phase = 2 * np.pi * np.cumsum(rate_hz * straying) / SR
    grip = unit(undb(flutter_db * walk(70 * speed)))  # the blade sticks and slips
    chatter = chatter_of_wall(phase, tonal, colours[1], speed, octave_db)
    rasp = rasp_of_teeth(phase, bright_db, colours[2], speed, bite, chip_share, spread, patchy_db,
                         bright_hz, sing, grit_db)
    bench = undb(bench_db) * levels[0] * colour(noise(), colours[0])
    cut = undb(chatter_db) * levels[1] * chatter + undb(rasp_db) * levels[2] * rasp
    return bench + grip * cut


def scene():
    """The quick part, then the end of the cut at natural speed."""
    quick_air = background(QUICK_AIR, QUICK_HUM, FAST)
    slow_air = background(SLOW_AIR, SLOW_HUM, 0.91)
    air = np.where(T < SLOW_FROM_S, quick_air, slow_air)

    strokes, bites = quick_strokes()
    quick = sawing(strokes, QUICK_COLOURS, FAST, shape=1.57, glide=0.33, wander=0.02, jitter=0.026,
                   octave_db=-24.0, patchy_db=3.5, flutter_db=2.5, pure=0.82, lock=1.3, bite=0.8,
                   chip_share=0.2, sing=0.38, spread=0.85, bright_hz=6650,
                   bench_db=1.5, chatter_db=-1.0, rasp_db=-4.0, grit_db=-7)
    quick = treble_gain(quick)
    quick = quick + catches(CATCHES + bites, thud_db=-7, body_db=-1.0, tick_db=-12.5, click_db=0.5)
    quick = room(quick, FAST, lag_ms=0.015, early_db=-16, early_s=0.14, late_db=-7.5, t60_s=0.47,
                 damp_hz=9150, boom_db=-6, boom_s=0.5, boom_hz=1850, wide_hz=1010, modes_db=-4)

    slow = sawing(SLOW_STROKES, SLOW_COLOURS, 0.99, shape=1.85, glide=0.5, wander=0.025, jitter=0.06,
                  octave_db=-7.0, patchy_db=2.0, flutter_db=1.5, pure=0.55, lock=0.66, bite=0.15,
                  chip_share=0.44, sing=0.29, spread=1.0, bright_hz=5000,
                  bench_db=-3.5, chatter_db=1.5, rasp_db=-0.5, grit_db=-10)
    slow = slow + blows() + breakthrough()
    slow = room(slow, 1.0, lag_ms=0.11, early_db=-10.5, early_s=0.22, late_db=-7.5, t60_s=0.26,
                damp_hz=5000, boom_db=-4.0, boom_s=0.62, boom_hz=610, wide_hz=293, modes_db=-8)
    return air + rub() + bumps() + quick + slow


def record(dry):
    """The recorder cuts the top steeply above 16.3 kHz."""
    return signal.sosfilt(signal.ellip(10, 0.2, 75, 16300, fs=SR, output="sos"), dry)


dry = scene()
out = record(dry)
pcm_store(out)
```